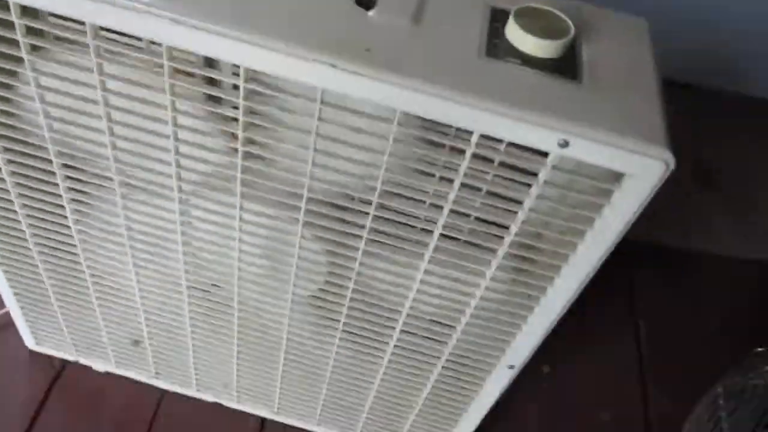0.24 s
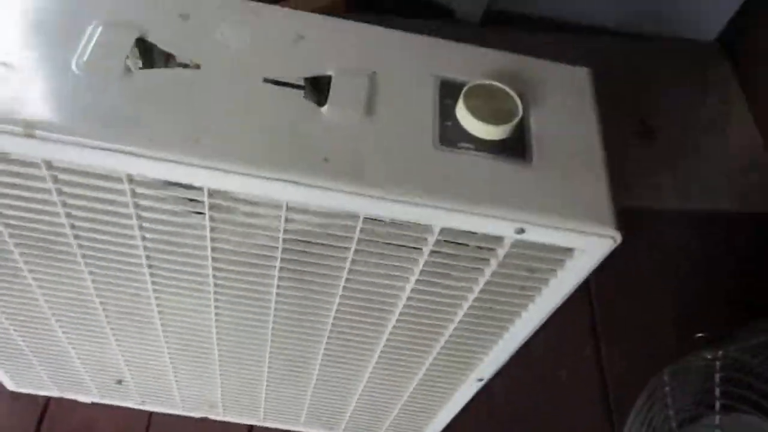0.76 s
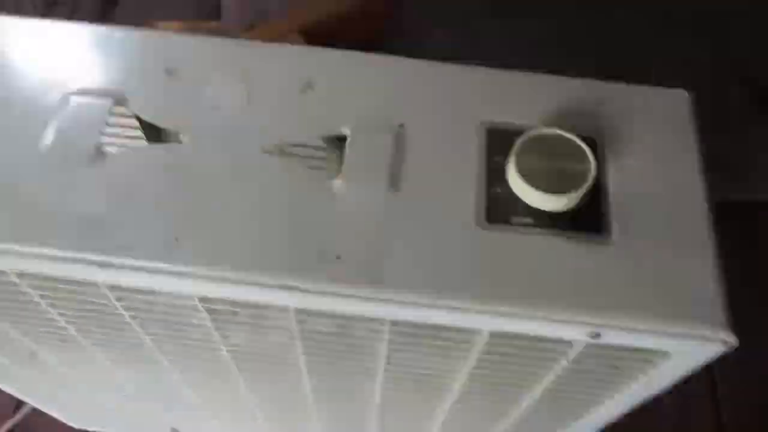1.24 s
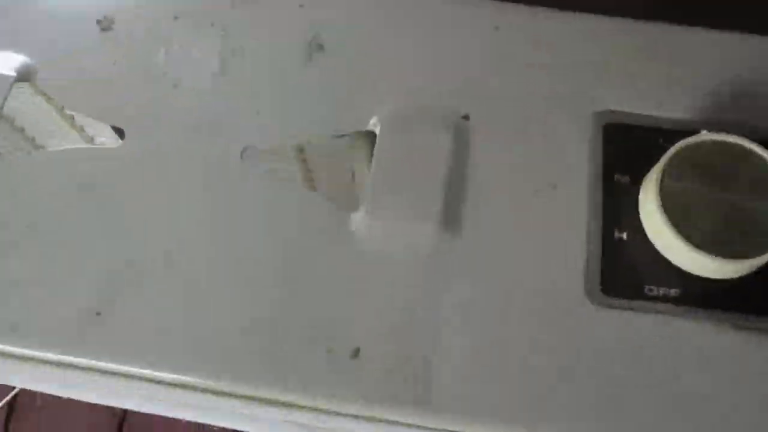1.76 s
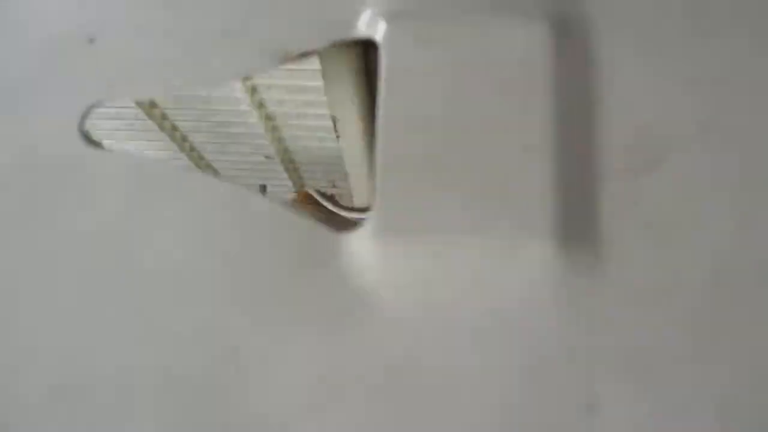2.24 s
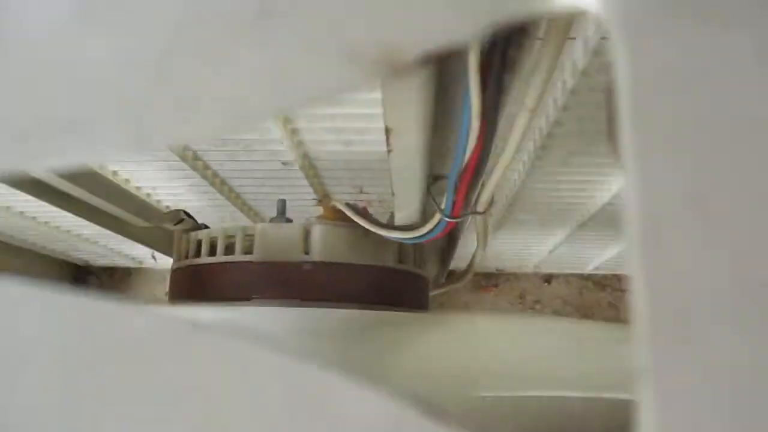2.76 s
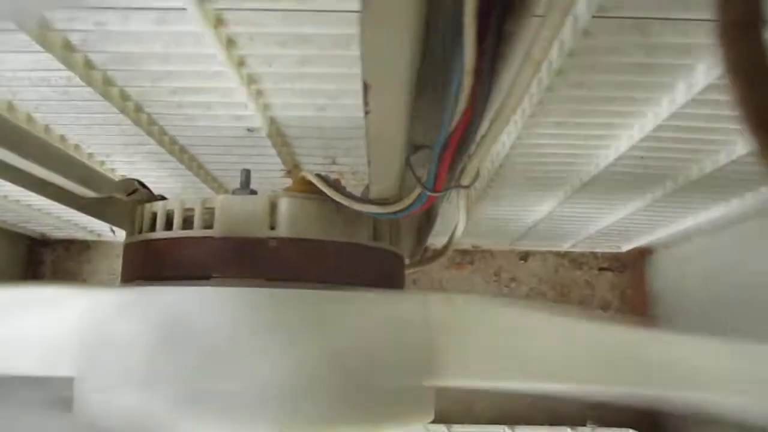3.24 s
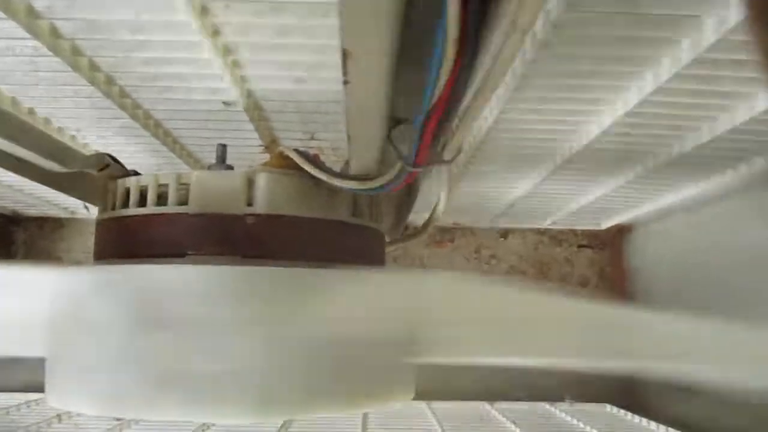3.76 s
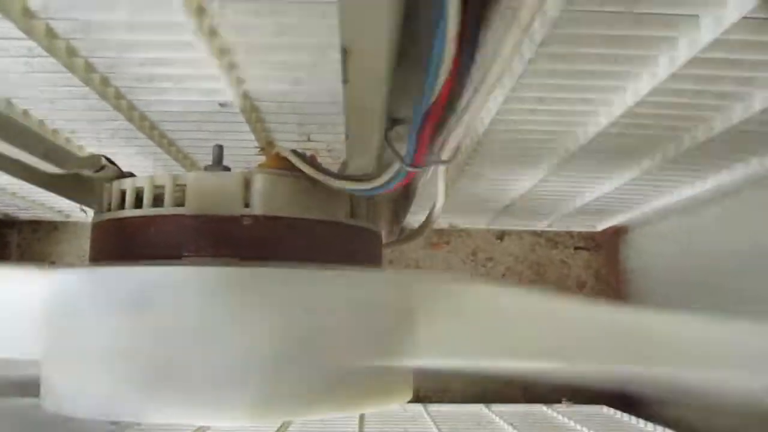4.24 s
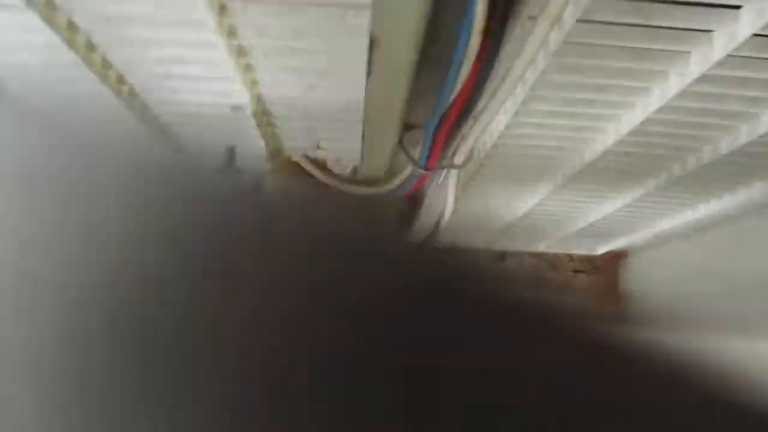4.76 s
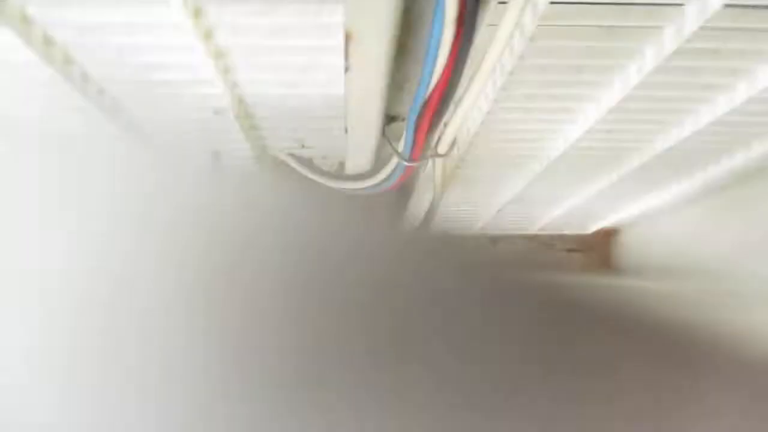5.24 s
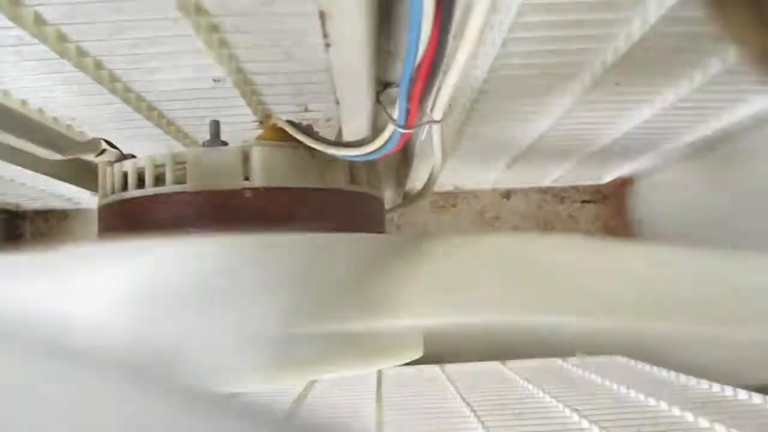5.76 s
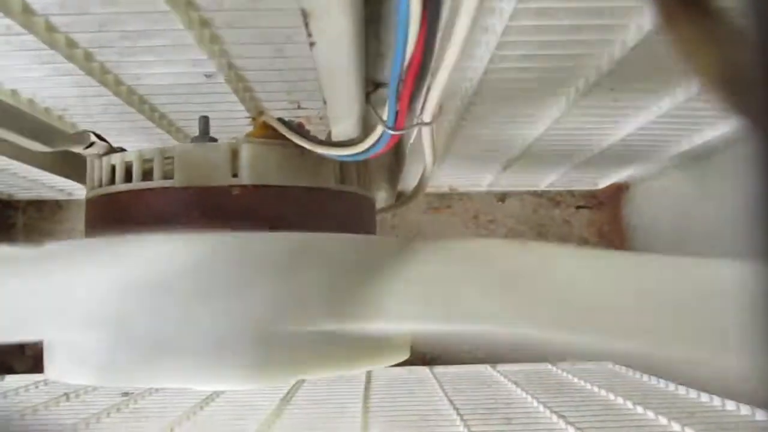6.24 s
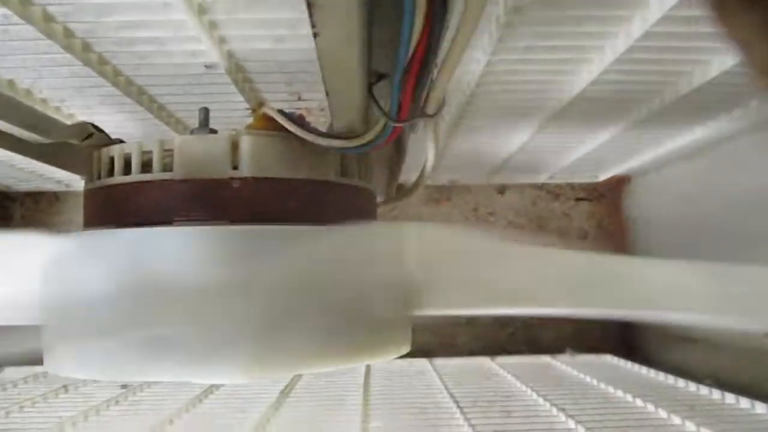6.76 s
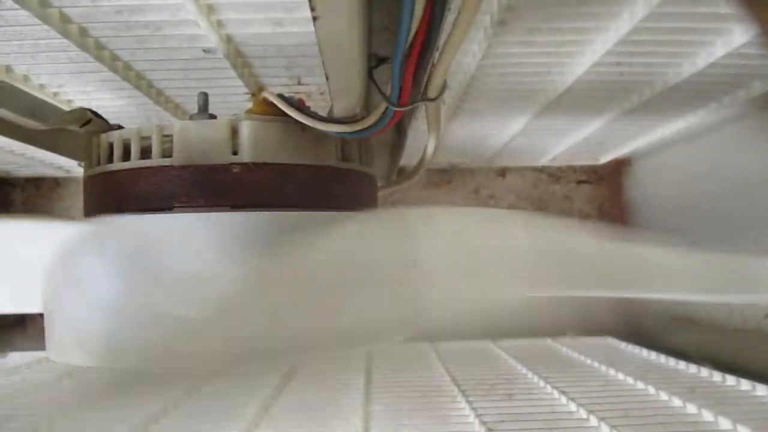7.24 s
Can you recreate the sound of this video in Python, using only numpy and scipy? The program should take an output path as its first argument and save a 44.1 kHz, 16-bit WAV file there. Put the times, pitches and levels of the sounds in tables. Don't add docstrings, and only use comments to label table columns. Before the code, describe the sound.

A box fan hums and flutters louder as the microphone nears a hole in its case, then clicks off and slows with soft knocks.

```python
import sys
import numpy as np
from scipy import signal
from scipy.fft import rfft, irfft, next_fast_len
from scipy.io import wavfile
from scipy.ndimage import uniform_filter1d, map_coordinates

SR = 44100
rng = np.random.default_rng(int(sys.argv[2]) if len(sys.argv) > 2 else 0)


def dump(signal):
    limited = np.clip(np.atleast_2d(signal).T, -1, 1)
    pcm = np.round(limited * 32767).astype(np.int16)
    wavfile.write(sys.argv[1], SR, pcm)


def natural_amplitude(level_db):
    exponent = np.asarray(level_db, float) / 20
    return 10 ** exponent


N = 330309

# t/s, distance gain/dB, gain of what is heard only at the hole/dB
CAMERA = [(0, -13, -35), (.4, -11, -34), (.85, -10, -38), (1.1, -9.5, -39), (1.4, -8.5, -37),
          (1.75, -5.5, -41), (2.0, -4.5, -27), (2.3, -3, -14), (2.6, -1.5, -7.5), (2.9, -0.8, -5),
          (3.2, 0.2, -4), (3.8, 0.4, 0.3), (4.6, -0.5, -2.5)]
# start/s, peak/s, end/s
GRIP = (4.62, 4.78, 4.9)


def unit(x):
    return x / np.sqrt(np.mean(x ** 2) + 1e-20)


def curves(rows):
    s, *cols = np.transpose(rows)
    return [np.interp(np.arange(N) / SR, s, c) for c in cols]


def swell(start, top, end):
    return np.interp(np.arange(N) / SR, [start, top, end], [0, 1, 0])


def wobble(rate):
    knots = rng.standard_normal(int(N * rate / SR) + 4)
    return map_coordinates(knots, [np.arange(N) * rate / SR])


def shaped(x, gain):
    hz = np.fft.rfftfreq(len(x), 1 / SR) + 1
    return unit(irfft(rfft(x) * gain(hz), len(x)))


def peak(hz, centre_hz, width_hz):
    return 1j * hz * width_hz / (centre_hz ** 2 - hz ** 2 + 1j * hz * width_hz)


def band(count, centre_hz, width_hz):
    noise = rng.standard_normal(next_fast_len(count, True))
    return shaped(noise, lambda f: peak(f, centre_hz, width_hz) ** 2)[:count]


def rush(spectrum, patchy_db):
    z = signal.stft(rng.standard_normal(N + 2048), nperseg=512)[2]
    field = uniform_filter1d(rng.standard_normal(z.shape), size=5, axis=0)
    field = uniform_filter1d(field, size=8, axis=1)
    x = signal.istft(z * natural_amplitude(patchy_db * unit(field)), nperseg=512)[1]
    f, db = np.transpose(spectrum)
    return shaped(x[:next_fast_len(N, True)], lambda hz: natural_amplitude(np.interp(np.log(hz), np.log(f), db)))[:N]


def add(x, s, piece):
    part = x[round(s * SR):][:len(piece)]
    part += piece[:len(part)]


def blade_rate():
    # t/s, blade rate/Hz
    powered = [(0.0, 55.64), (2.3, 55.64), (2.8, 55.79), (3.3, 55.82), (3.8, 55.88), (4.3, 56.07),
               (4.7, 55.6), (4.87, 56.45)]
    drag_per_s, friction_per_s2 = .47, .0525
    coast_s = np.clip(np.arange(N) / SR - powered[-1][0], 0, None)
    return curves(powered)[0] / (1 + drag_per_s * coast_s + friction_per_s2 * coast_s ** 2)


def blades():
    # level/dB, share of hole gain, rise under the hand/dB, power of the speed
    orders = [
        (-21.5, 0.94, 3, 3.68),
        (-26, 0.67, 7, 2.94),
        (-33, 0.63, 3, 3),
        (-39, 0.53, 5, 3.2),
    ]
    lag_rad = [0, -.25, -1.7, -1.5]
    # shaft order, level re first blade tone/dB
    shaft_orders = [(3, -25.5), (4, -29), (6, -18), (7, -38), (8, -18.5), (9, -23), (11, -21.5)]
    speed = blade_rate()
    hole_db, slowed_db = curves(CAMERA)[1], 20 * np.log10(speed / speed[0])
    hand_db = 2.5 * swell(4.75, 5.0, 6.6)
    grip = swell(*GRIP)
    order_db = [level + share * hole_db + grip_db * grip + hand_db + power * slowed_db
                for level, share, grip_db, power in orders]
    angle = 2 * np.pi * (np.cumsum(speed) / SR + .24)
    slowing = 1 - speed / speed[0]
    lead_rad = 1.9 * np.clip(slowing, 0, 1)
    tones, uneven = 0, 0
    for k, level in enumerate(order_db):
        shaken = natural_amplitude(level + (.5 + .4 * k) * wobble(9))
        tones = tones + shaken * np.cos((k + 1) * angle + lag_rad[k] + lead_rad)
    for order, level in shaft_orders:
        shaken = natural_amplitude(order_db[0] + level + 2.5 * wobble(4))
        uneven = uneven + shaken * np.cos(order * angle / 5 + 7 * rng.random())
    shaft = (angle - angle[round(5.936 * SR)]) / 5
    slow = np.clip(slowing, 0, .28)
    bent = natural_amplitude(17 * slow * (np.cos(shaft / 2) ** 12 - .22 + .2 * wobble(12)))
    return np.sqrt(2) * (bent * tones + natural_amplitude(2.0 - 18 * slow) * uneven)


def motor():
    # t/s, level/dB
    hum = [(0, -39.5), (.45, -40), (.9, -35), (1.2, -35.5), (1.8, -29.5), (2.4, -19.5), (2.95, -18.5),
           (3.35, -22), (4.6, -22)]
    off_s, decay_t60_s, grip_hum_db = 4.885, 0.042, 3
    t = np.arange(N) / SR
    low_db = curves(hum)[0] + grip_hum_db * swell(*GRIP)
    high_db = -32.5 + 0.82 * curves(CAMERA)[1]
    mains = 2 * np.pi * 120 * t
    slip = 1 + .45 * np.exp(2j * np.pi * 8.2 * t) + .25 * np.exp(-2j * np.pi * 11.7 * t)
    low = natural_amplitude(low_db + .5 * wobble(8)) * np.cos(mains - 2.5)
    second = natural_amplitude(low_db - 29.0 + 2.2 * wobble(5)) * np.cos(2 * mains)
    high = natural_amplitude(high_db + 1.6 * wobble(17)) * (slip * np.exp(3j * mains)).real
    field = natural_amplitude(-60 * np.clip(t - off_s, 0, None) / decay_t60_s)
    return np.sqrt(2) * (natural_amplitude(1.67) * low + high + second) * field


def grille(hz):
    # f/Hz, width/Hz, level re rush/dB
    modes = [(205, 21, -16.5), (435, 49, -21.5), (487.7, 13, -18.5), (609, 9.9, -17), (860, 16, -33.5),
             (844, 16, -21), (1079, 28, -22), (1277, 28, -22), (1468, 21, -30.5), (1716, 81, -25.5)]
    power = sum(natural_amplitude(2 * db) / width * np.abs(peak(hz, centre, width)) ** 4 for centre, width, db in modes)
    return np.sqrt(power)


def air():
    # f/Hz, level/dB per Hz
    buffet_spectrum = [(15, -32.5), (30, -10.5), (60, -0.5), (120, 1), (250, 1.5), (400, -9.5),
                       (700, -32.5), (1200, -75.5)]
    rush_spectrum = [(200, -17.5), (300, -9), (400, -2.5), (470, -6.5), (540, -6), (605, -5), (665, -8.5),
                     (860, -8.5), (1170, -12), (1400, -15), (1750, -22), (2500, -29), (3300, -48.5),
                     (5500, -120)]
    hiss_spectrum = [(880, -10), (1500, -1.5), (2720, -7.5), (3480, -12), (6190, -21), (7230, -18),
                     (8050, -25.5), (12000, -32.5), (15500, -40.5)]
    # start/s, peak/s, end/s, level/dB
    puffs = [
        (0.374, .45, 0.56, -1.5),
        (0.94, 1.077, 1.09, 3),
        (3.313, 3.388, 3.25, -1.5),
        (4.59, 4.816, 4.997, 8.5),
        (5.102, 5.224, 5.95, 2.5),
        (6.227, 6.273, 6.8, 3.5),
        (6.854, 6.92, 7.18, 10),
    ]
    # level/dB, share of distance gain, power of the speed, share of a puff
    laws = [(-31, 1.47, 3.5, 1.03), (-32, 1.0243, 4, 0.8), (-43, 0.8, 5, 0.92)]
    (near_db, hole_db), speed = curves(CAMERA), blade_rate()
    slowed_db = 20 * np.log10(speed / speed[0])
    puff_db = sum(db * swell(start, top, end) for start, top, end, db in puffs)
    buffet_db, rush_db, hiss_db = (db + near * near_db + power * slowed_db + puff * puff_db
                                   for db, near, power, puff in laws)
    eddy = wobble(13)
    whistles = shaped(rng.standard_normal(next_fast_len(N, True)), grille)[:N]
    whistles = natural_amplitude(-11.0 - .1 * hole_db) * whistles
    buffet = natural_amplitude(buffet_db + 2.0 + 0.56 * eddy + 0.27 * wobble(40)) * rush(buffet_spectrum, patchy_db=1.0)
    body_gain = natural_amplitude(rush_db + 0.5 + 0.52 * eddy + 0.56 * wobble(60))
    body = body_gain * (rush(rush_spectrum, patchy_db=1.0) + whistles)
    hiss = natural_amplitude(hiss_db - 2.5 + 0.77 * eddy + 1.3 * wobble(50)) * rush(hiss_spectrum, patchy_db=0.6)
    return buffet + body + hiss


def approach_tones():
    # (f/Hz, width/Hz, level/dB)
    swelling_tones = [
        ((.9, 1.8, 2.5), (481, 8, -46.5)),
        ((.55, 1.2, 0.5), (640, 150, -44)),
        ((.5, 0.92, 3), (1250, 610, -52.5)),
    ]
    return sum(natural_amplitude(db) * swell(*span) ** .5 * band(N, centre_hz, width_hz)
               for span, (centre_hz, width_hz, db) in swelling_tones)


def case():
    # t/s, peak/dB, f/Hz, t60/s
    knocks = [(.36, -33, 206, 0.21), (1.1145, -23, 2380, 0.0083), (4.648, -26.5, 5900, 0.054),
              (4.7, -22.5, 4100, 0.015), (4.757, -31.5, 5140, .03), (4.876, -33, 6200, 0.014),
              (4.649, -21, 4820, .02), (0.637, -20, 2600, 0.014), (.638, -25, 750, .01),
              (5.115, -31, 2700, 0.016), (0.67, -21.5, 1340, 0.017), (1.827, -27, 4500, 0.0065),
              (3.4769, -23, 3980, .005), (4.11, -17, 406, 0.073), (4.116, -19, 210, .1),
              (4.749, -21, 378, 0.05), (4.826, -8, 268, .06), (4.83, -13.5, 374, 0.16),
              (6.281, -24, 230, 0.07), (6.28, -25, 406, 0.034), (6.28, -36.5, 1280, 0.03),
              (6.711, -29.5, 383, 0.032), (6.895, -14, 142, 0.03), (6.899, -19.5, 2280, 0.022),
              (6.898, -18.5, 955, 0.024), (6.898, -10.5, 640, 0.014), (6.9, -11, 380, 0.022),
              (6.911, -25, 363, 0.1), (6.947, -41, 1000, .02), (6.984, -38, 497, .04),
              (7.193, -29, 229, .03), (7.2, -27, 330, 0.033), (7.212, -34, 300, 0.027),
              (7.201, -35.5, 1130, 0.026),
              (4.666, -20, 1070, .02), (4.672, -32, 2090, .02), (4.684, -24, 1200, .025),
               (4.716, -27, 2020, .015), (4.733, -20, 1070, 0.028), (4.741, -29, 2300, .018),
               (4.749, -26.5, 1900, 0.022), (4.771, -15.5, 338, 0.084), (4.774, -17, 800, .02),
               (4.788, -20, 420, .04), (4.812, -21, 392, .06), (4.819, -18, 1250, 0.029),
               (4.871, -18.5, 640, 0.037), (4.89, -25, 400, .04)]
    x, t = np.zeros(N), np.arange(6144) / SR
    for s, db, pitch_hz, t60 in knocks:
        ring = np.sin(2 * np.pi * pitch_hz * t) + 0.32 * band(len(t), pitch_hz, .6 * pitch_hz)
        onset = 1 - np.exp(-t * pitch_hz / .7)
        add(x, s, natural_amplitude(db - 60 * t / t60) * ring * onset)
    return x


def snaps():
    # t/s, peak/dB, lowest f/Hz, highest f/Hz
    clicks = [(0.6382, -18, 2290, 10600), (0.638, -14, 2220, 6450), (.682, -40, 2000, 9000),
              (1.1144, -27.5, 1900, 9500), (3.4786, -7.5, 2000, 10500), (4.748, -17, 400, 2500),
              (4.8586, -27, 900, 5000), (4.928, -17, 1000, 5400), (5.158, -19.5, 500, 5000),
              (5.3274, -15.5, 350, 6500), (5.3276, -18, 500, 2500), (7.2005, -39, 300, 1500),
              (5.4362, -18.5, 400, 3730), (6.4122, -33, 700, 4200)]
    x, t = np.zeros(N), np.arange(512) / SR
    for s, db, low_hz, high_hz in clicks:
        blow = 0.055 * rng.standard_normal(512) * natural_amplitude(-60 * t / 0.0099)
        blow[2] += 1
        edges_hz = np.clip([low_hz, high_hz], 50, 20000)
        snap = signal.sosfilt(signal.butter(3, edges_hz, "band", fs=SR, output="sos"), blow)
        add(x, s, natural_amplitude(db) * snap / np.abs(snap).max())
    return x


def ticks():
    # t/s, peak/dB, brightest pitch/octaves re 1 kHz, fall away from it/dB per
    contact_ticks = [(.0074, -47.5, 0.58, 10), (.1146, -48.5, 1.3, 19), (0.13, -50.5, .4, 7),
                     (0.188, -50, 1.3, 3.5), (.292, -41, 0.32, 13), (.638, -36, 2.5, 8),
                     (0.67, -38.5, 1.8, 16), (0.7205, -40, 2.5, 10), (1.05, -39.5, 0.61, 11),
                     (1.114, -45, 1.5, 8), (1.3348, -42.5, 0.43, 13), (1.7517, -31.5, 0.56, 11),
                     (1.826, -38, 1.2, 18), (1.835, -41.5, 1.5, 11), (1.8882, -42, .4, 6.5),
                     (1.9555, -51.5, 1.5, 10), (2.13, -36, 0.36, 12), (2.226, -49.5, 2.3, 13),
                     (3.478, -36, 3.9, 13), (4.1154, -33.5, 0.56, 7.5),
                     (4.5094, -40.5, 1.5, 15), (4.52, -35.5, 2.03, 20), (4.549, -46.5, 2, 8),
                  (4.648, -27, 2.56, 6.9), (4.6982, -31.5, 2, 10), (4.718, -31.5, 2.2, 3.7),
                  (4.758, -39, 2.3, 12), (4.846, -40.5, 1.2, 7), (4.8563, -42.5, 1.6, 5.8),
                  (4.8756, -44, 2.7, 2.5), (4.895, -49, 1.5, 7), (4.9277, -40, 0.79, 18),
                     (6.136, -46, 0.37, 18), (6.412, -36, 0.43, 14), (6.8345, -39, 0.64, 17),
                  (6.8961, -31.5, 0.75, 18), (6.9, -33, 0.37, 21), (7.203, -51, 0.93, 12)]
    release_ticks = [(5.0202, -48.5, 2, 7), (5.1153, -50, 1.5, 20), (5.1581, -44, 3.2, 5),
                     (5.221, -47, 2.3, 3.1), (5.326, -43, 2, 5.1), (5.436, -48, .6, 14),
                     (5.519, -43, 3.7, 5)]
    # f/Hz, width/Hz, t60/s
    shell = [(1280, 1100, 0.028), (2840, 2700, 0.014), (6000, 3500, 0.0011), (9450, 1300, 0.004),
             (12700, 3200, .004)]
    held_db = [1.7, 3.9, -1.5, -3, -10]
    released_db = [16, 4, -8, 1, -7]
    x, t = np.zeros(N), np.arange(1024) / SR
    octave = np.log2(np.transpose(shell)[0] / 1000)
    rows = [(row, np.array(held_db)) for row in contact_ticks]
    rows += [(row, np.array(released_db)) for row in release_ticks]
    for (s, peak_db, bright, fall_db), colour_db in rows:
        blow = .2 * rng.standard_normal(len(t)) * natural_amplitude(-60 * t / .005)
        blow[2] += 1
        bands_db = peak_db - fall_db * np.abs(octave - bright) + colour_db
        for db, (centre_hz, width_hz, t60) in zip(bands_db, shell):
            blow = -blow
            impact = shaped(blow, lambda f: peak(f, centre_hz, width_hz) ** 2 / (1 + (f / centre_hz / 1.5) ** 6))
            shake = band(len(t), centre_hz, width_hz) * natural_amplitude(-60 * t / t60) * (1 - np.exp(-t / 0.00064))
            add(x, s, natural_amplitude(db - 6.5) * unit(impact + 1.3 * unit(shake)))
    return x


def fingers():
    # t/s, length/s, level/dB
    rubs = [(0, 0.064, -68), (.644, .05, -55.5), (.72, .011, -63), (.945, 0.027, -57), (1.04, .03, -59.5),
            (1.113, 0.056, -57), (1.241, 0.045, -55), (1.668, .045, -53.5), (1.751, .027, -53),
            (1.78, .07, -63), (1.85, .041, -56), (2.127, 0.011, -50), (2.222, 0.051, -52),
            (3.469, 0.008, -49), (4.117, .013, -50), (4.51, 0.032, -52.5), (4.64, 0.015, -32.5),
            (4.658, 0.063, -42.5), (4.703, .075, -40.5), (4.75, 0.02, -50), (4.8, 0.091, -45.5),
            (4.896, .1, -47.5), (5.323, 0.027, -47.5), (5.404, 0.073, -46), (5.43, .02, -51),
            (5.494, 0.033, -44), (5.513, .012, -36), (5.722, 0.1, -53.5)]
    # t/s, length/s, level/dB, f/Hz
    squeaks = [(0.178, .044, -66, 8900), (0.645, 0.057, -66, 14000), (1.029, 0.15, -63, 9400),
               (1.241, .061, -62, 9400), (1.478, 0.037, -65, 8520), (1.664, 0.056, -56, 9000),
               (1.725, 0.066, -57, 9100), (5.068, 0.038, -56, 11800), (5.095, .025, -59, 9600)]
    # t/s, length/s, level/dB, f/Hz
    scrapes = [(1.043, .025, -51, 3100), (1.124, 0.041, -52.5, 3200), (1.249, .035, -53, 3100),
               (1.682, 0.037, -49.5, 2600), (1.757, 0.022, -41, 2700), (4.6, .025, -29, 1660),
               (4.732, 0.029, -27.5, 1420), (4.66, 0.028, -35.5, 1550), (7.198, 0.0092, -51.5, 3100),
               (5.725, 0.11, -51, 2300), (5.425, 0.039, -52, 11500), (4.643, 0.018, -40, 15000),
               (4.2, 0.011, -32, 1100), (5.4, 0.018, -33, 750), (5.512, 0.011, -46, 3600),
               (4.755, .025, -36, 2000), (5.3, 0.043, -40, 1600), (5.33, 0.021, -45.5, 2200),
               (5.438, 0.036, -43.5, 2300)]
    x, t = np.zeros(N), np.arange(8192) / SR
    strokes = [(*row, 4600, 9000) for row in rubs]
    strokes += [(*row, .14 * row[-1]) for row in squeaks]
    strokes += [(*row, 0.66 * row[-1]) for row in scrapes]
    for s, length_s, db, centre_hz, width_hz in strokes:
        noise, grain = rng.standard_normal((2, 8192))
        grainy = noise * natural_amplitude(23 * uniform_filter1d(grain, size=90))
        skin = shaped(grainy, lambda f: peak(f, centre_hz, width_hz) ** 2 / (1 + (f / 10500) ** 4))
        stroke = np.abs(np.sin(np.pi * np.clip(t / length_s, 0, 1))) ** 0.55
        add(x, s, natural_amplitude(db) * stroke * skin)
    return x


def yard():
    # f/Hz, level/dB per Hz
    wash_spectrum = [(59, -26.5), (100, 7), (140, 1.5), (193, -9.5), (381, -0.5), (471, -7.5), (836, -10.5),
                     (4200, -23.5), (6020, -24.5), (7290, -18), (8460, -27.5), (12100, -33), (16000, -40)]
    # f/Hz, width/Hz, level/dB
    insects = [
        (7300, 1000, -65),
        (11800, 25, -80),
        (5850, 80, -83),
    ]
    # t/s, f/Hz, level/dB
    bird_glide = [(2.6, 3610, -64), (2.71, 3630, -55), (2.77, 3720, -59), (2.82, 3850, -54),
                  (2.87, 3955, -53), (2.91, 4030, -61), (2.945, 4140, -57), (3.0, 4165, -61),
                  (3.06, 4220, -54), (3.095, 4240, -60)]
    # t/s, gain/dB
    opening = [(0, -19.5), (.4, -9.5), (1.1, -6), (1.8, -4.5), (2.65, -1.5), (3.8, -4.5), (4.6, 0),
               (5.5, 1.5), (7.49, 2)]
    t = np.arange(N) / SR
    hz, bird_db = curves(bird_glide)
    edge_s, gap_db = .02, 20.5 * swell(2.77, 2.785, 2.8)
    edge = np.clip(np.minimum(t - bird_glide[0][0], bird_glide[-1][0] - t) / edge_s, 0, 1)
    bird_gain = natural_amplitude(bird_db - 2.5 - gap_db + 3.5 * wobble(30)) * edge
    bird = bird_gain * np.sin(2 * np.pi * np.cumsum(hz) / SR)
    chorus = sum(natural_amplitude(level + 0.72 * wobble(35)) * band(N, c, w) for c, w, level in insects)
    wash = natural_amplitude(-47.5 - 2.5) * rush(wash_spectrum, patchy_db=.3)
    return natural_amplitude(curves(opening)[0]) * (wash + chorus) + bird


def scene():
    fan = blades() + motor() + air() + approach_tones()
    handling = case() + snaps() + ticks() + fingers()
    return (fan + handling + yard())[None]


def low_pass(x):
    return signal.sosfilt(signal.butter(12, 16680, fs=SR, output="sos"), x)


def record(dry):
    m = next_fast_len(N, True)
    passed = np.fft.rfftfreq(m, 1 / SR) < 15870
    kept = irfft(rfft(dry, m) * passed, m)[:, :N]
    return low_pass(kept)


dry = scene()
out = record(dry)
dump(out)
```